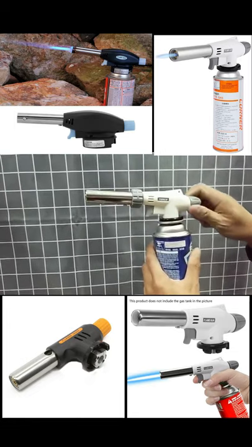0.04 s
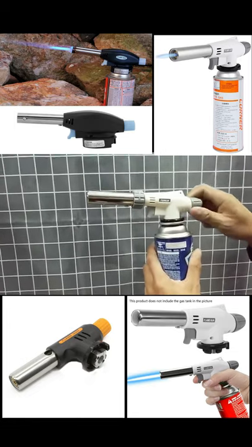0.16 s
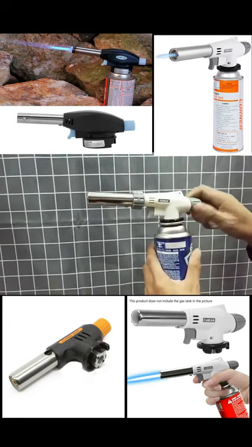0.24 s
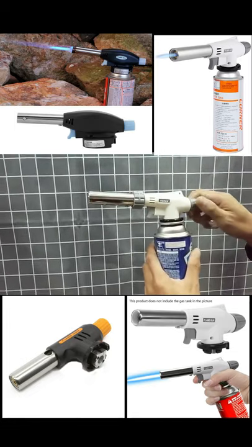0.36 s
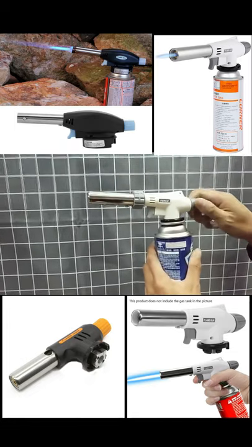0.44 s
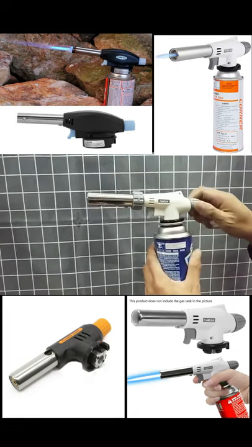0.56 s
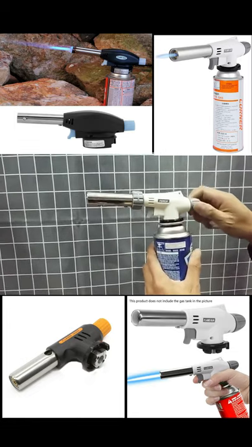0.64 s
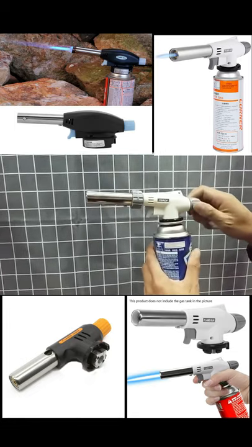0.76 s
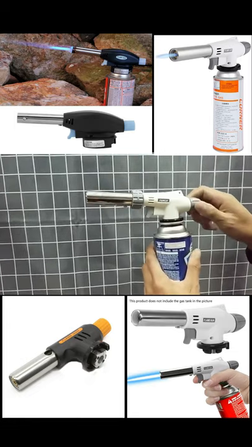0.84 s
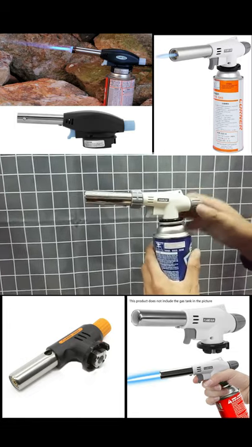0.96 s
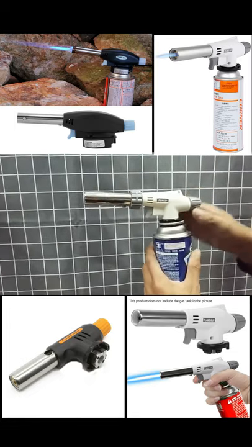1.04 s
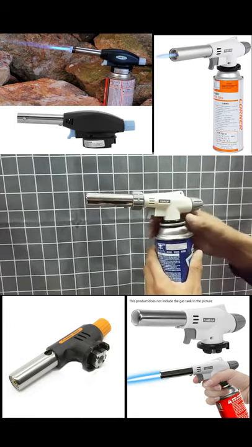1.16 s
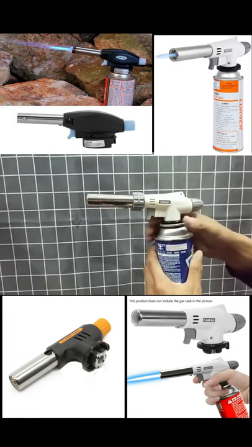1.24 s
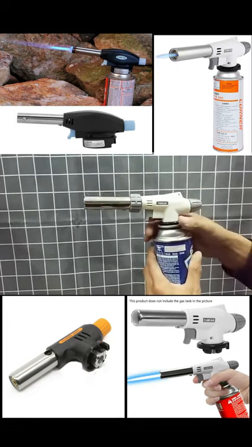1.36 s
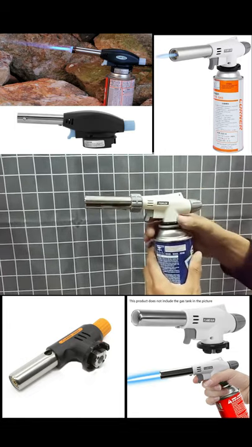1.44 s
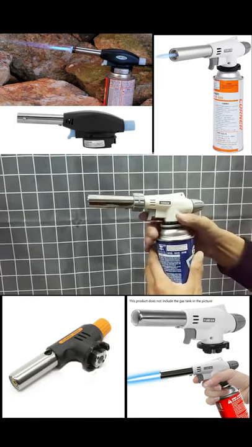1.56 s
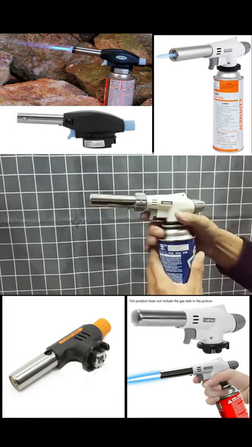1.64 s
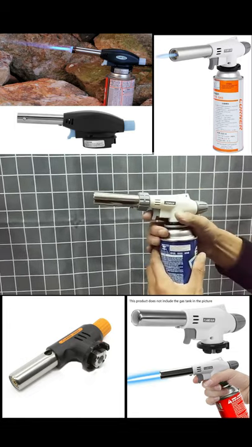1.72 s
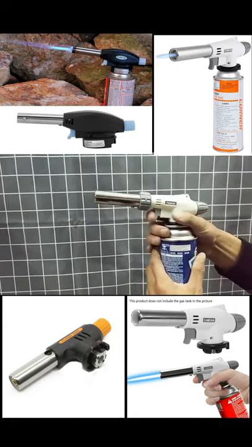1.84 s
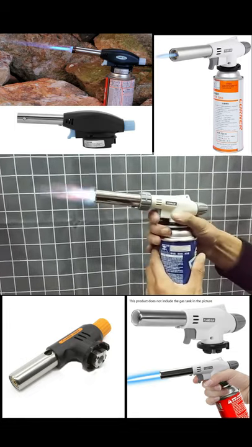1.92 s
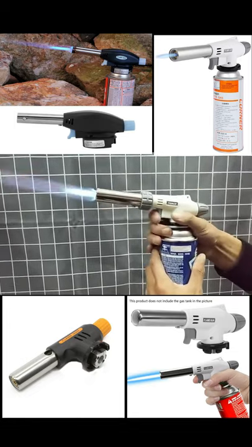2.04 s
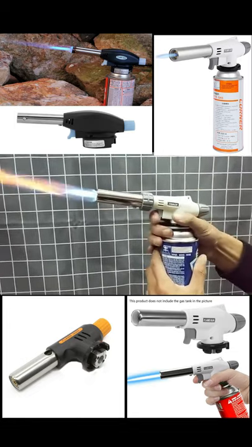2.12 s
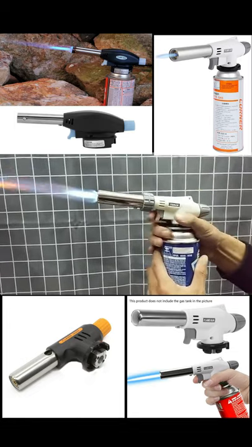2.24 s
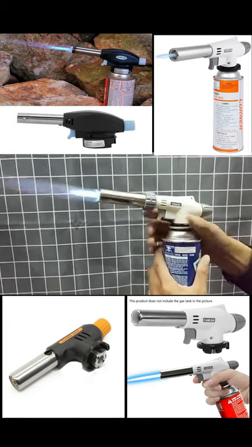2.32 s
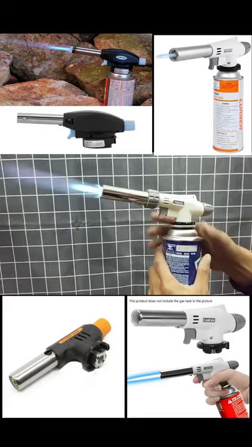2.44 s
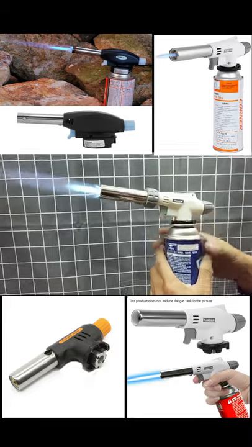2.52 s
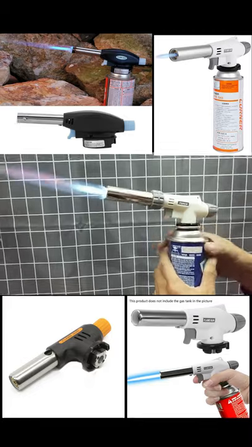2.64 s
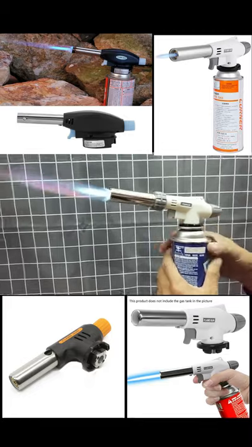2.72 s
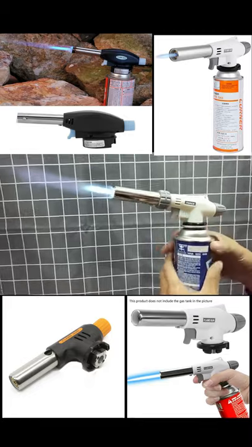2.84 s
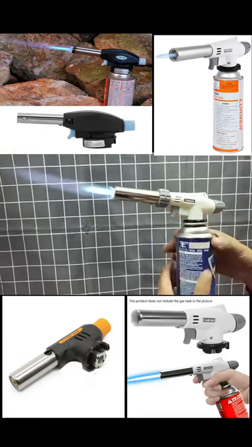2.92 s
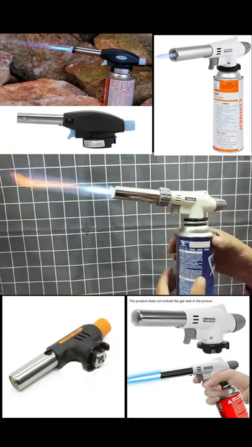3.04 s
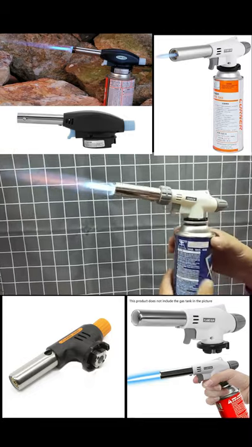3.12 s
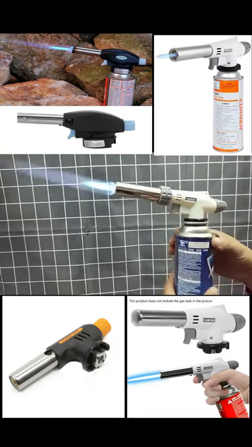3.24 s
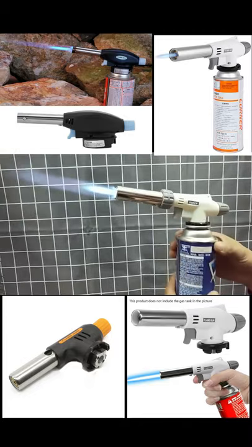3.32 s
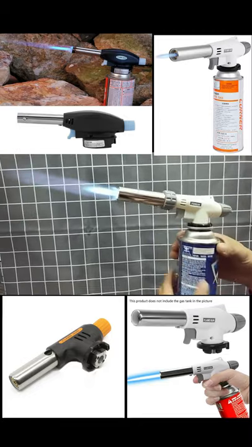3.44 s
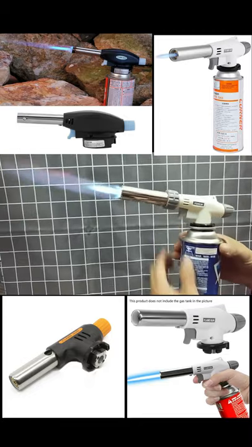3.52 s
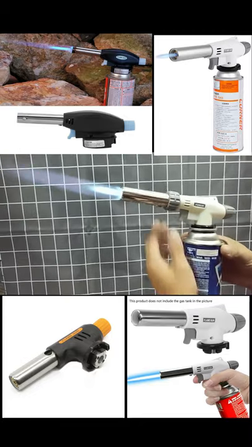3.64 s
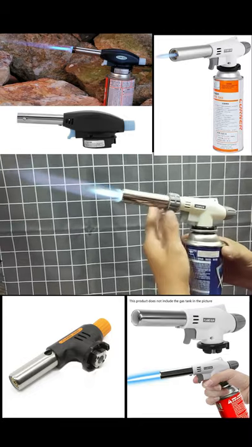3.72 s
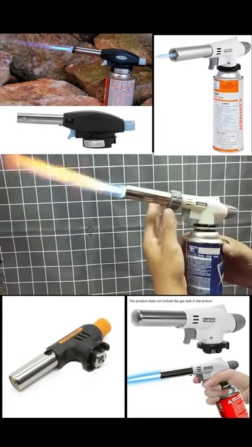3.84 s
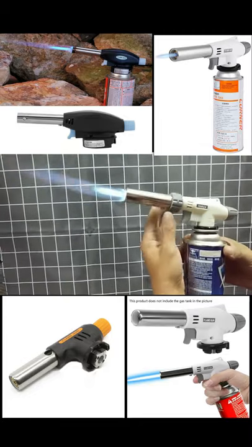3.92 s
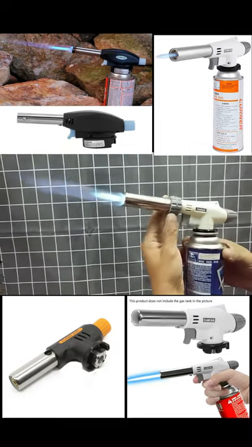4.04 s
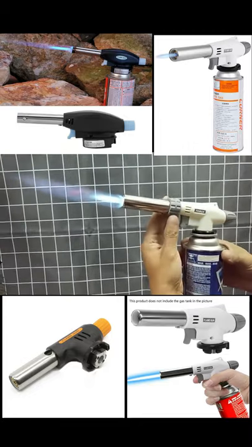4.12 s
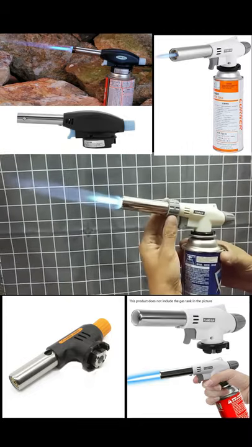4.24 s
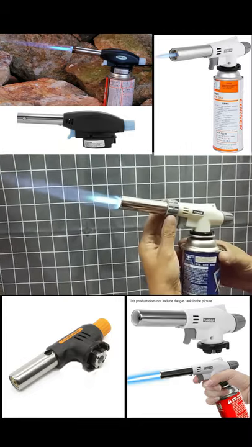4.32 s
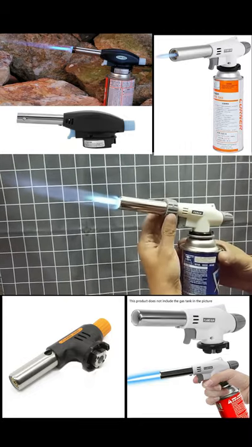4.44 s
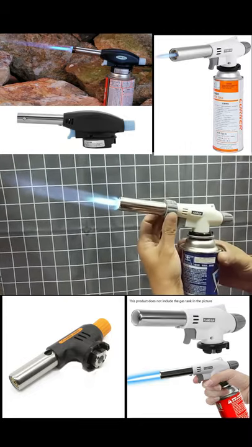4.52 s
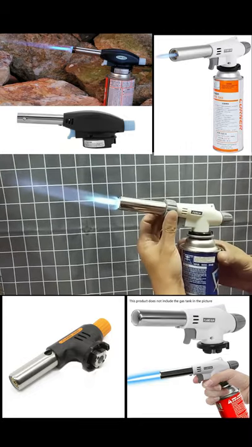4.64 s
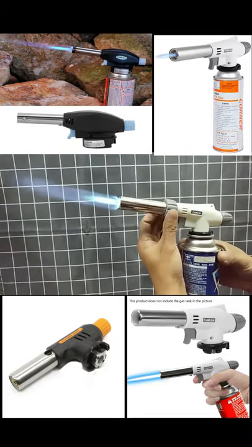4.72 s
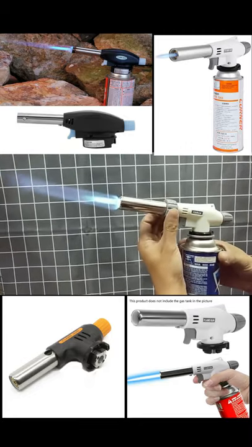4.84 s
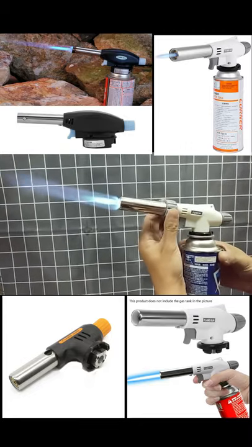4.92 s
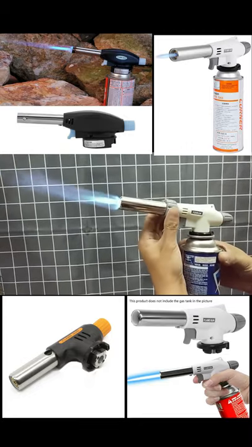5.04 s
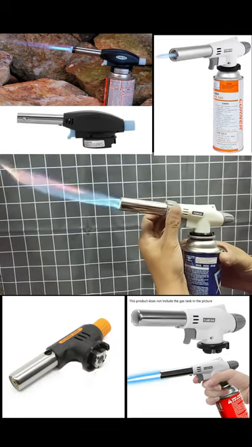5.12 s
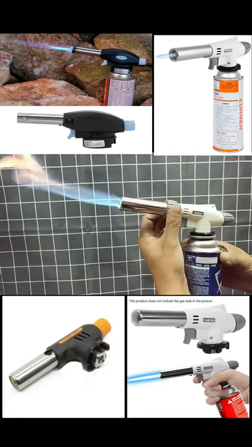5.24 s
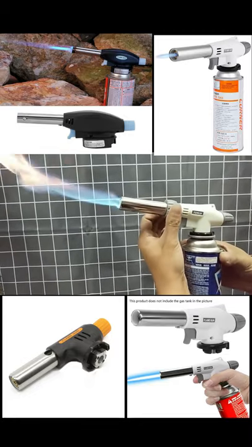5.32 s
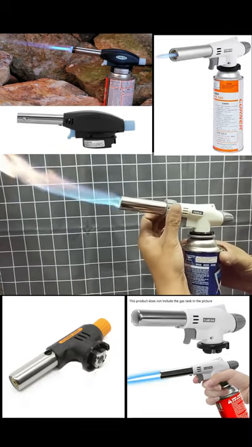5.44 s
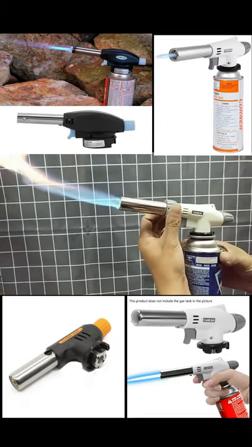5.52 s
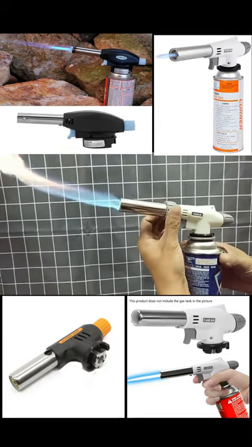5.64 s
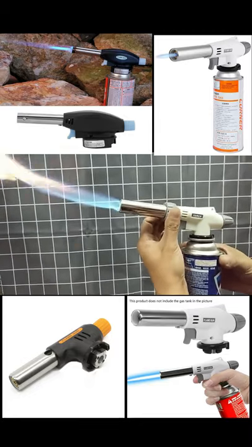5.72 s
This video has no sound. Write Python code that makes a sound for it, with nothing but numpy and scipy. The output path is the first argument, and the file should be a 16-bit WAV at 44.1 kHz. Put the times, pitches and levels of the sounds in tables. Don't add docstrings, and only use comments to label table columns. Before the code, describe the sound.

Gas hisses and whistles from a hand torch, a sharp plastic trigger click ignites a steady roar, then the flame drops to a soft hiss.

```python
import sys
import numpy as np
from scipy import signal
from scipy.fft import rfft, irfft
from scipy.io import wavfile
from scipy.ndimage import uniform_filter1d

SR = 44100
rng = np.random.default_rng(int(sys.argv[2]) if len(sys.argv) > 2 else 0)


def transcribe(u):
    v = np.clip(np.atleast_2d(u).T, -1, 1)
    q = np.round(v * 32767).astype(np.int16)
    wavfile.write(sys.argv[1], SR, q)


def to_linear_factor(level_db):
    exponent = np.asarray(level_db, float) / 20
    return 10 ** exponent


N = 254898
HZ = np.fft.rfftfreq(512, 1 / SR)[:, None]
TIMES = np.arange(N // 128 + 5) * 128 / SR
CATCH_S = 1.943
SOFT_S, SOFT_FALL_S = 5.03, 0.091


def evened(x):
    return x / np.sqrt(np.mean(x ** 2) + 1e-20)


def ramp(start_s, length_s):
    return np.clip((TIMES - start_s) / length_s, 0, 1)


def curve(rows):
    s, value = np.transpose(rows)
    return np.interp(TIMES, s, value)


def read(points, hz=HZ):
    f, db = np.transpose(points)
    return np.interp(np.log(hz + 1), np.log(f + 1), db, left=-70, right=-90)


def resonance(hz, width_hz, order):
    return 1 / (1 + (2 * (HZ - hz) / width_hz) ** order)


def steady(points):
    hz = np.fft.rfftfreq(N, 1 / SR)
    white = rfft(rng.standard_normal(N))
    return evened(irfft(white * to_linear_factor(read(points, hz)), N))


def turbulence(colour, level_db, patchy_db, flicker_db):
    a, b, patches, streaks = rng.standard_normal((len(TIMES), len(HZ), 4)).T
    patches = evened(uniform_filter1d(uniform_filter1d(patches, size=5, axis=0), size=20, axis=1))
    streaks = evened(uniform_filter1d(streaks, size=60, axis=1))
    patches = patches + 1.16 * streaks
    flicker = evened(uniform_filter1d(rng.standard_normal(len(TIMES)), size=4))
    colour = colour / np.sqrt(np.sum(colour ** 2, axis=0))
    grains = a + 1j * b
    white = signal.istft(grains, nperseg=512, noverlap=384)[1].std() / np.sqrt(len(HZ))
    z = grains * colour * to_linear_factor(level_db + patchy_db * patches + flicker_db * flicker)
    return signal.istft(z, nperseg=512, noverlap=384)[1][:N] / white


# frequency in Hz, level in dB.
ROOM_AIR = [(25, -19), (50, -1.5), (80, -6.5), (120, -4.5), (138, -4), (148, 6), (158, -10.5), (200, -5.5),
            (300, -12.5), (700, -14.5), (1100, -13.5), (2000, -16.5), (4400, -30), (5000, -51)]


def room():
    return to_linear_factor(-55.5) * steady(ROOM_AIR)


def walls(x):
    t60_s = 0.13
    at = np.arange(150, SR // 4, 22)
    at = at + rng.integers(0, 22, len(at))
    tail = np.zeros(SR // 4 + 22)
    tail[at] = rng.choice([-1., 1.], len(at)) * to_linear_factor(-60 * at / SR / t60_s)
    return signal.oaconvolve(x, tail / np.linalg.norm(tail))[:N]


# frequency in Hz, level in dB.
LAP_COLOUR = [(30, -17), (55, -26), (78, -3.5), (110, -9.5), (190, -3), (300, -14), (450, -16), (700, -36)]
# centre in seconds, half length in seconds, level in dB.
HEAVES = [
    (2.1, .2, -53),
    (4.897, 0.15, -39),
]


def lapping():
    hard_db, soft_db = -70, -51.5
    level = to_linear_factor(hard_db + (soft_db - hard_db) * ramp(SOFT_S - .1, SOFT_FALL_S))
    for s, half_s, db in HEAVES:
        level = level + to_linear_factor(db) * np.exp(-((TIMES - s) / half_s) ** 2)
    gusts = evened(uniform_filter1d(rng.standard_normal(len(TIMES)), size=25))
    level = (TIMES > CATCH_S) * level * to_linear_factor(1.1 * gusts)
    return steady(LAP_COLOUR) * np.interp(np.arange(N) / SR, TIMES, level)


# start in seconds, ring in dB, crack in dB, rise in ms, thump in dB.
SNAPS = [
    (1.6383, -21, -73.5, 0.78, -63),
    (1.9512, -24.5, -27, 0.25, -40),
    (1.9522, -2, -25.5, 1.17, -22.5),
    (1.958, -19, -57, 0.68, -46),
    (2.2189, -3, -32.5, 0.84, -34),
    (4.57, -28, -70, 0.34, -53),
]
# frequency in Hz, level in dB, t60 in seconds.
LIGHT_BODY = [(3130, 2.5, 0.014), (3310, -5, 0.011), (4650, -0.5, 0.006), (1900, -1, 0.0055),
              (5100, -7.5, 0.0088), (5540, -22, 0.0095), (14100, -31, .006)]
HEAVY_BODY = [(3040, 3, 0.016), (3400, 9, 0.0092), (2270, -0.5, 0.016), (1500, -4.5, 0.013),
              (4170, 5, 0.011), (4580, 1, 0.012), (786, -9.5, 0.0087), (1100, -25, 0.0064),
              (5440, -14, 0.015), (6450, -18, 0.011), (5960, -30, 0.035), (9964, -50, 0.026),
              (12440, -27, 0.022), (13800, -41, .02)]
SOFT_BODY = [(3100, 8, 0.015), (3650, 0, .01), (1730, 3, 0.0073), (4300, 4, 0.0096)]
SNAP_BODIES = [SOFT_BODY, HEAVY_BODY, HEAVY_BODY, HEAVY_BODY, LIGHT_BODY, SOFT_BODY]


def trigger():
    thump_hz, thump_t60_s = 141, 0.05
    out, t = np.zeros(N), np.arange(4000) / SR
    for (s, ring_db, crack_db, rise_ms, thump_db), body in zip(SNAPS, SNAP_BODIES):
        swell = (1 - np.exp(-1000 * t / max(rise_ms, .05))) ** 2
        ring = sum(to_linear_factor(db - 60 * t / t60) * np.sin(2 * np.pi * hz * t) for hz, db, t60 in body)
        bright = signal.lfilter([1, -.6], 1, rng.standard_normal(len(t)))
        crack = bright * np.exp(-(t / .0018) ** 2)
        thump = to_linear_factor(thump_db - 60 * t / thump_t60_s) * np.sin(2 * np.pi * thump_hz * t)
        out[round(s * SR):][:len(t)] += to_linear_factor(ring_db) * swell * ring + to_linear_factor(crack_db) * crack + thump
    return out


# time in seconds, gas flow as hiss level in dB.
VALVE = [
    (0, -55.5),
    (.1, -47),
    (.17, -42.5),
    (.45, -40),
    (.65, -34.5),
    (1.4, -33.5),
    (1.87, -34.5),
    (2.4, -32.5),
    (5.78, -35),
]
# time in seconds, share shut from 0 to 1.
COLLAR = [
    (2.3, 0.28),
    (3.6, 0.02),
    (4, 0.31),
    (4.62, 0.51),
    (4.8, 0.87),
    (4.9, 1),
    (5.03, 0.92),
    (5.12, 0.87),
]
# time in seconds, extra path of the table echo in metres.
POSE = [(2, 0.253), (2.3, 0.275), (2.55, 0.29), (3.2, .288), (3.5, .322), (3.75, 0.33), (3.87, 0.301),
        (4.3, .33), (4.8, 0.32)]
# frequency in Hz, level in dB.
HISS_OPEN = [(600, -41), (1100, -36), (1350, -17), (1800, -17), (2130, -36), (2340, 7.5), (2600, -4),
             (3000, -4.5), (3280, -5.5), (3550, -6), (3870, -0.5), (4330, -9), (4600, -23.5), (5000, -51)]
HISS_SHUT = [(500, -33), (1200, -26), (1800, -34), (2050, -14), (2500, -16), (2820, -20), (3080, -1),
             (3400, -4), (3650, -7), (3870, -15), (4150, -6), (4400, -15), (4700, -19), (5100, -42)]


def hiss(flow_db, shut, closed):
    near_m, away_db_per_m = 0.26, -100
    away_db = away_db_per_m * np.maximum(curve(POSE) - near_m, 0)
    colour = to_linear_factor((1 - shut) * read(HISS_OPEN) + shut * read(HISS_SHUT))
    slow_db = 0.45 * np.maximum(-39.5 - flow_db, 0)
    colour = colour * to_linear_factor(slow_db * resonance(2340, 180, 2))
    bared_db = 2.5 * closed
    return turbulence(colour, flow_db + away_db + bared_db, patchy_db=0.25, flicker_db=0.75)


# frequency in Hz, level in dB.
FIZZ_OPEN = [(4800, 15), (5700, 5.5), (6150, 3), (6450, 9.5), (6750, -2.5), (7000, -3), (8300, -3),
             (9800, -5), (10600, -4), (11500, -8), (13000, -3), (15000, .5), (15450, 4)]
FIZZ_SHUT = [(4800, 1), (5600, 5), (6150, 10.5), (6900, -8), (7600, -20), (8300, -34), (8650, -3),
             (9200, 0), (9800, -9), (10700, -9), (11300, -7), (12300, -11), (13500, 1), (15450, -1.5)]
# frequency in Hz, width in Hz, shift as a share once the collar shuts.
WHISTLES = [(7570, 230, 0), (9090, 180, 0.023), (12200, 380, -0.045), (14000, 1100, 0), (5810, 470, 0)]
# dB over the fizz at rest, change in dB once the flame is soft.
WHISTLE_REST = [(-2, -28), (0, 2), (-1, 4), (-13, 0), (0, -6)]
# start in seconds, end in seconds, gain in dB.
SPEAKING = [
    [(.52, .98, 8), (1.53, 1.97, 11), (3.28, 4.5, 4), (4.55, 5.1, -9)],
    [(1, 1.52, 5), (2.2, 2.45, 4), (3.28, 4.02, 9), (4.55, 5.1, 7)],
    [(.52, 1.3, 4), (1.53, 1.8, 5), (2.38, 3.7, 6), (4.03, 4.52, 9), (4.55, 5.1, -6)],
    [(4.5, 5.1, 19)],
    [(-.1, 1.95, 9)],
]
COLD_WHISTLE = 10900, 190, 0.89


def fizz(flow_db, shut, closed):
    full_db, laminar_db = -34, -45
    fizz_db = -69 + 0.97 * (flow_db - full_db)
    fizz_db = fizz_db + 1.7 * np.minimum(flow_db - laminar_db, 0) - 2.5 * shut
    power = to_linear_factor((1 - closed) * read(FIZZ_OPEN) + closed * read(FIZZ_SHUT)) ** 2
    top = power[HZ[:, 0] > 12800].sum(axis=0)
    thin_db = 0.54 * np.clip(-35 - flow_db, 0, 12)
    turn_s = .08
    for (hz, width, shift), (rest_db, soft_db), spells in zip(WHISTLES, WHISTLE_REST, SPEAKING):
        db = rest_db + thin_db + soft_db * closed
        for start_s, end_s, up_db in spells:
            db = db + up_db * (ramp(start_s, turn_s) - ramp(end_s, turn_s))
        power = power + to_linear_factor(db) ** 2 * resonance(hz * (1 + shift * shut ** 6), width, 4)
    hz, width, db = COLD_WHISTLE
    power = power + (TIMES < CATCH_S) * to_linear_factor(db + thin_db) ** 2 * resonance(hz, width, 4)
    fizz_db = fizz_db + 10 * np.log10(power.sum(axis=0) / top)
    return turbulence(np.sqrt(power), fizz_db, patchy_db=1.7, flicker_db=0.3)


def jet():
    cold_shut = 0.38
    lit, closed = ramp(CATCH_S, 0.37), ramp(SOFT_S, SOFT_FALL_S)
    flow_db = curve(VALVE)
    shut = np.clip(cold_shut + lit * (curve(COLLAR) - cold_shut), 0, 1)
    return hiss(flow_db, shut, closed) + fizz(flow_db, shut, closed)


# frequency in Hz, level in dB.
ROAR_COLOUR = [(60, -41), (100, -38), (160, -10), (230, 1.04), (450, 0.36), (600, -5.5), (1000, -3.5),
               (1600, -9), (2300, -5), (3400, -4), (4100, -12.5), (4700, -16.5), (5200, -35), (6500, -56)]


def flame():
    spread_s, grow_s = 0.027, 0.068
    kernel_db, blaze_db = -39.5, -27
    grown = ramp(CATCH_S + spread_s, grow_s)
    starved = np.clip(curve(COLLAR), 0, 1) ** 2
    since_s = np.maximum(TIMES - CATCH_S - spread_s - grow_s, 0)
    flare_db = 1.5 * np.exp(-since_s / 0.053)
    full_db = blaze_db + flare_db - 7 * starved - 33 * ramp(SOFT_S, SOFT_FALL_S) ** 2
    roar_db = kernel_db + grown * (full_db - kernel_db)
    dull_tilt, bright_tilt = -0.5, 0.58
    tilt = dull_tilt + np.sqrt(grown) * (bright_tilt - dull_tilt) - 2 * starved
    echo_share, echo_turn = 0.48, 0.62
    comb = abs(1 - echo_share * np.exp(2j * np.pi * (HZ * curve(POSE) / 343 - echo_turn)))
    colour = to_linear_factor(read(ROAR_COLOUR) + tilt * np.log2(HZ / 250 + .1)) * comb
    level_db = np.where(TIMES < CATCH_S, -121, roar_db)
    return turbulence(colour, level_db, patchy_db=0.65, flicker_db=0.34)


def scene():
    rush, snaps = jet() + flame(), trigger()
    echoes = walls(to_linear_factor(-12) * rush + to_linear_factor(-33) * snaps)
    return (to_linear_factor(-0.44) * rush + snaps + echoes + lapping() + room())[None]


def ducked(x):
    from_db, share, back_db_per_s, lag_s = -20, 0.7, 104, 0.0047
    power_db = 10 * np.log10(uniform_filter1d(x[0] ** 2, size=200) + 1e-12)
    fall = np.arange(N) * back_db_per_s / SR
    held_db = np.maximum.accumulate(power_db + fall) - fall
    over_db = uniform_filter1d(np.maximum(held_db - from_db, 0), size=200)
    late_db = np.interp(np.arange(N) - lag_s * SR, np.arange(N), over_db)
    return x / to_linear_factor(share * late_db)


def low_pass(x):
    return signal.sosfilt(signal.butter(12, 16470, fs=SR, output="sos"), x)


def record(dry):
    ceiling = 1.1
    rounded = ceiling * np.tanh(ducked(dry) / ceiling)
    low_cut = signal.butter(2, 61.3, "high", fs=SR, output="sos")
    top_cut = signal.butter(18, 15300, fs=SR, output="sos")
    mix = signal.sosfilt(np.vstack([low_cut, top_cut]), rounded)
    return low_pass(mix)


dry = scene()
out = record(dry)
transcribe(out)
```